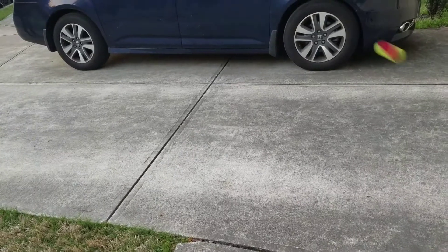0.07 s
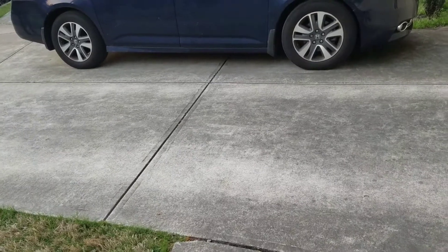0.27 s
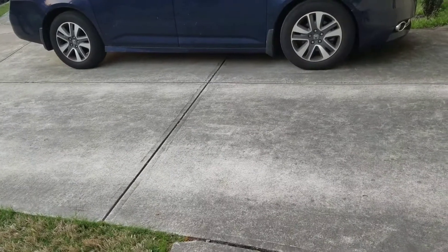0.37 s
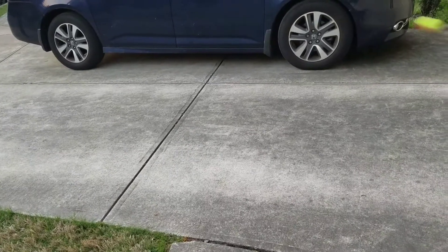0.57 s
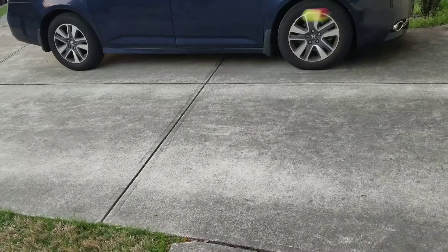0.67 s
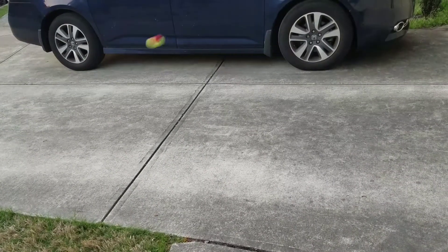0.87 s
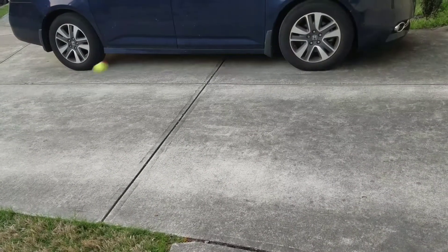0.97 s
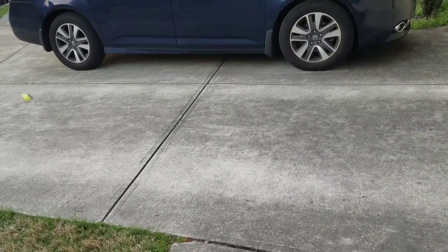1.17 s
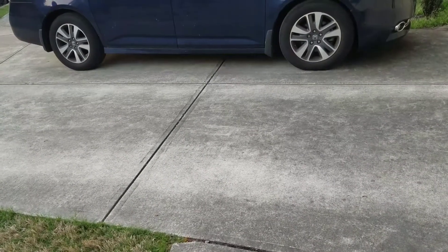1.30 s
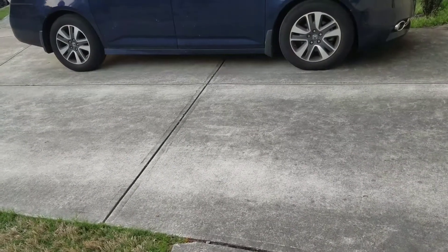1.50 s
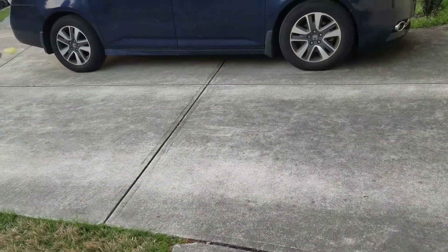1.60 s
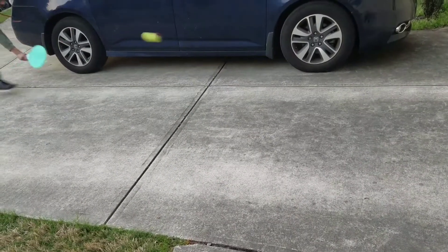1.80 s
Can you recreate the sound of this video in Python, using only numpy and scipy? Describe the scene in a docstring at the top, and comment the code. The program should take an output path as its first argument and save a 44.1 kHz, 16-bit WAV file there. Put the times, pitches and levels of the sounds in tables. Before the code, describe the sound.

Paddles hit a ball on a concrete driveway over a faint outdoor rumble. A shoe scuffs, and a hollow thump sounds at 0.2 seconds. A paddle strikes sharply, slightly right, at 0.4 seconds, followed by sliding shoes. The ball bounces more softly at 1.1 seconds. A second paddle hits at 1.5 seconds and rings briefly to the left. More gritty scuffs follow, and a foot lands around 1.8 seconds.

```python
"""A short rally on a concrete driveway, heard from a stereo microphone pair beside a parked car.
Over a low outdoor rumble a shoe scuffs on grit, and a hollow thump follows at 0.24 s.
A paddle on the right strikes the ball at 0.39 s; the shoes slide, and it bounces on the concrete at 1.13 s.
At 1.51 s a second paddle strikes and rings on to the left; more scuffs follow and a foot lands.
Nearby walls scatter each blow back to the microphones."""
import sys
import numpy as np
from scipy import signal
from scipy.fft import irfft
from scipy.io import wavfile
from scipy.ndimage import uniform_filter1d

SR = 44100
rng = np.random.default_rng(int(sys.argv[2]) if len(sys.argv) > 2 else 0)


def persist_wave(psi):
    """Save psi, clipped to +-1, as 16-bit WAV."""
    counts = np.round(np.clip(psi, -1, 1) * 32767).astype(np.int16)
    wavfile.write(sys.argv[1], SR, np.atleast_2d(counts).T)


N = 81585
TIME = np.arange(N) / SR
FREQS = np.maximum(np.fft.rfftfreq(N, 1 / SR), 1)
DIFFUSE_PAN_DB = -1.4  # diffuse sound sits slightly to the right
THUD_WIDTH, SNAP_WIDTH = 1.316, 1.444  # upper band edge over centre frequency


def from_db(db):
    """Decibels to gain."""
    return 10 ** (np.asarray(db) / 20)


def over_freq(points):
    """A table read on a log-frequency axis."""
    hz, value = np.transpose(points)
    return np.interp(np.log(FREQS), np.log(hz), value)


def filtered(x, hz, kind, order=2):
    """A Butterworth filter."""
    return signal.sosfilt(signal.butter(order, hz, kind, fs=SR, output="sos"), x)


def fade(start, t60):
    """Full level until the start, then an exponential decay."""
    return np.exp(-np.log(1000) * np.maximum(TIME - start, 0) / t60)


def rise(start, length):
    """A ramp from silence to full level."""
    return np.clip((TIME - start) / max(length, 1 / SR), 0, 1)


def flicker(depth_db, samples):
    """A gain that wanders at random, smoothed over so many samples."""
    drift = uniform_filter1d(rng.standard_normal(N), size=samples)
    return from_db(depth_db * drift / drift.std())


def delayed(x, t):
    """The same sound, t seconds later."""
    return np.interp(TIME - t, TIME, x, left=0)


def pan(db):
    """Gains at the two microphones; positive favours the left."""
    return from_db(np.array([[db], [-db]]) / 2)


def place(x, pan_db, lag):
    """A point source at the pair; with a positive lag it reaches the left microphone later."""
    return pan(pan_db) * np.array([delayed(x, max(lag, 0)), delayed(x, max(-lag, 0))])


def pulse(t, db, hz, width):
    """A pressure pulse of about two cycles: a thud when low, a snap when high."""
    push = filtered(signal.unit_impulse(N) + 1e-18, [hz / width, hz * width], "band")
    return -from_db(db) * delayed(push / np.abs(push).max(), t)


# How alike diffuse sound is at the two microphones: f/Hz, correlation
PAIR_CORRELATION = [(100, 0.97), (300, 0.81), (700, 0), (1500, 0), (4000, 0.0014), (12000, 0)]
def noise(spectrum, lift_db=0):
    """Diffuse stereo noise from levels per octave, with an optional lift at each frequency."""
    lowest_hz = spectrum[0][0]
    per_octave = np.sqrt(SR / np.sqrt(2) / np.maximum(FREQS, lowest_hz))
    gain = from_db(over_freq(spectrum) + lift_db) * per_octave * np.minimum(FREQS / lowest_hz, 1)
    alike = over_freq(PAIR_CORRELATION)
    mid, side = np.exp(2j * np.pi * rng.random((2, len(FREQS)))) * gain * np.sqrt(N / 2)
    mid, side = mid * np.sqrt(1 + alike), side * np.sqrt(1 - alike)
    return irfft(np.array([mid + side, mid - side]), N)


# Open air all around the driveway: f/Hz, level/dB per octave
OPEN_AIR = [(20, -84), (45, -66.5), (80, -55.5), (120, -54), (170, -58), (240, -56), (400, -62),
            (1000, -65.5), (2200, -65), (4000, -74), (7800, -81.5), (11000, -73.5), (15000, -67.5)]
# A machine in the distance: f/Hz, level/dB
MACHINE_HUM = [(120, -55), (240, -61.5)]
def outdoors():
    """A low rumble and faint hiss, with the wavering hum of a distant machine."""
    hum = 0
    for hz, db in MACHINE_HUM:
        waver = flicker(depth_db=4, samples=4001)
        hum += from_db(db) * waver * np.sin(2 * np.pi * (hz * TIME + rng.random()))
    return noise(OPEN_AIR) + hum


# What comes back from far off: f/Hz, relative level/dB per octave
FAR_SPECTRUM = [(60, -3.5), (140, 4), (300, -5.5), (600, -7), (1600, -6.5), (2700, -12), (4500, -27),
                (8000, -41), (15000, -26)]
FAR_RISE_S = 0.038
def far_tail(t, db):
    """The distant surroundings answer a blow with a faint, slow wash."""
    return from_db(db) * noise(FAR_SPECTRUM) * rise(t, FAR_RISE_S) * fade(t, t60=1)


def wall_scatter(t, db, t60, crack, modes):
    """Nearby walls scatter a blow into noise that keeps the struck body's resonances."""
    width_hz, peak_db, dip_db = 64, 9.5, 3
    peaks = np.max([1 / (1 + ((FREQS - hz) / (width_hz / 2)) ** 2) for hz, _, _ in modes], axis=0)
    lift_db = peak_db * peaks * np.minimum(FREQS / 1000, 1) - dip_db
    arrival = t + 0.0044
    return from_db(db) * noise(crack, lift_db) * rise(arrival, length=0.0017) * fade(arrival, t60)


def near_reflections(strike, pan_db, echoes):
    """The ground, the car and a wall throw back the bright part of a strike."""
    bright = filtered(strike, 700, "high")
    return sum(from_db(db) * place(delayed(bright, delay), pan_db, lag) for delay, db, lag in echoes)


# A sole's hiss and rasp, and one grain's crack: f/Hz, relative level/dB per octave
HISS_SPECTRUM = [(1500, -7), (3500, -6), (5500, -4), (7800, -13.5), (10500, -1), (13000, -1), (15000, -8)]
RASP_SPECTRUM = [(200, -35.5), (600, -6), (1000, -4.5), (1500, 0), (2500, 1.5), (4000, -20), (8000, -37)]
GRAIN_SPECTRUM = [(2000, -26), (7500, -32), (10000, -2), (13000, -1), (15000, 8)]
# Slides on the driveway: t/s, attack/s, hold/s, t60/s, hiss level/dB, rasp level/dB
SLIDES = [(0.04, 0.015, 0.065, 0.11, -46.5, -51), (0.24, 0.0015, 0.0055, 0.015, -39, -34),
          (0.513, 0.01, 0.043, 0.18, -52.5, -59), (0.553, 0.0054, 0.063, 0.13, -88, -52),
          (1.6145, 0.0014, 0.003, 0.068, -44.5, -40.5), (1.628, 0.0013, 0.0082, 0.13, -50, -46),
          (1.675, .02, 0.042, .3, -61, -50.5), (1.798, 0.0025, 0.0039, .11, -50, -44),
          (1.8415, 0.0025, .02, .1, -42.5, -45.5)]
# Single grains underfoot: t/s, level/dB, t60/s
GRAIN_TICKS = [(1.023, -53.5, 0.023), (1.0821, -42, 0.0081), (1.144, -58, 0.011), (1.764, -52, 0.043)]
# The thud of a landing foot: t/s, level/dB, f/Hz
FOOT_THUD = (1.8415, -29.5, 130)
def shoes():
    """Soles slide over grit with a grainy hiss and rasp; single grains tick and a foot lands."""
    hiss, rasp = noise(HISS_SPECTRUM), noise(RASP_SPECTRUM)
    graininess = flicker(depth_db=2, samples=49)
    slides = 0
    for t, attack, hold, t60, hiss_db, rasp_db in SLIDES:
        envelope = rise(t, attack) * fade(t + attack + hold, t60)
        slides += envelope * (from_db(hiss_db) * hiss + from_db(rasp_db) * rasp)
    ticks = sum(from_db(db) * (TIME > t) * fade(t, t60) for t, db, t60 in GRAIN_TICKS)
    return graininess * slides + ticks * noise(GRAIN_SPECTRUM) + pulse(*FOOT_THUD, THUD_WIDTH)


def paddle_face(t):
    """The left paddle's face rings on through the swing, then dies away into the surroundings."""
    hz, note_db, wash_db = 641, -25, -45.5
    release = t + 0.056
    note = from_db(note_db) * np.sin(2 * np.pi * hz * (TIME - t))
    note *= rise(t, length=0.0091) * fade(release, t60=0.18)
    wash = filtered(rng.standard_normal((2, N)), [hz - 15, hz + 15], "band", order=1)
    wash *= from_db(wash_db) / wash.std() * rise(t, FAR_RISE_S) * fade(release, t60=1)
    return place(note, pan_db=7.5, lag=0.00031) + wash


def ring(t, modes):
    """Decaying sines set off by one blow; neighbouring modes swing in opposite directions."""
    age = np.maximum(TIME - t, 0)
    return sum((-1) ** k * from_db(db) * np.sin(2 * np.pi * hz * age) * fade(t, t60)
               for k, (hz, db, t60) in enumerate(modes))


def blow(contact, snap, echoes, modes, crack):
    """One contact rings, snaps, cracks and thuds; it reaches the pair directly and by reflection."""
    t, pan_db, lag, thud_db, thud_hz, crack_db, scatter_db, scatter_t60, far_db = contact
    snap_delay, snap_db, snap_hz = snap
    burst = from_db(crack_db) * noise(crack)[0] * (TIME > t) * fade(t, t60=0.017)
    click = pulse(t + snap_delay, snap_db, snap_hz, SNAP_WIDTH)
    strike = ring(t, modes) + click + filtered(burst, 300, "high")
    direct = place(strike + pulse(t, thud_db, thud_hz, THUD_WIDTH), pan_db, lag)
    diffuse = wall_scatter(t, scatter_db, scatter_t60, crack, modes) + far_tail(t, far_db)
    return direct + near_reflections(strike, pan_db, echoes) + pan(DIFFUSE_PAN_DB) * diffuse


# The modes each contact sets ringing: f/Hz, level/dB, t60/s
THUMP_RING = [(86, -45, 0.75), (140.1, -20, 0.42), (148.5, -17.5, 0.24), (203, -28, .14),
              (245.3, -22.5, 0.29), (303.4, -26.5, 0.22), (428, -33, .11), (593, -39.5, 0.072),
              (887, -23.5, 0.05), (1036, -32.5, 0.11), (1237, -37, 0.15), (1470, -20.5, 0.02),
              (2300, -45, .03)]
RIGHT_PADDLE_RING = [(402, -32.5, 0.23), (643, -41, 0.24), (813, -21, 0.021), (1014, -16.5, 0.023),
                     (1460, -16, 0.1), (1703, -14, 0.05), (1976, -29.5, 0.097), (2130, -22.5, 0.015),
                     (2492, -21.5, 0.037), (2877, -23, 0.035), (3865, -26.5, 0.027)]
BOUNCE_RING = [(192, -26.5, 0.1), (324, -43, 0.047), (880, -27.5, 0.014), (1069, -30, .09),
               (1334, -30, 0.013)]
LEFT_PADDLE_RING = [(199.4, -34, 0.19), (730, -31, .1), (809, -30, .09), (1010, -18.5, 0.046),
                    (1430, -18, 0.04), (1561.5, -24, 0.13), (1880, -29, 0.018), (2047, -17.5, 0.047),
                    (2340, -15, 0.01), (2740, -34.5, .18), (2910, -30, 0.058), (2970, -31.5, 0.071),
                    (3240, -41, 0.05), (4256, -38, 0.091)]
# The noisy part of each contact: f/Hz, relative level/dB per octave
THUMP_CRACK = [(30, -52), (90, -20), (220, -26.5), (450, -29), (1100, -40.5), (2300, -42.5), (4500, -40),
               (7800, -52.5), (11000, -41.5), (15000, -49)]
RIGHT_PADDLE_CRACK = [(60, -44), (170, -20.5), (450, -36.5), (800, -30), (1500, -27), (2800, -35.5),
                      (4500, -44), (6300, -51), (8000, -65), (14000, -60)]
BOUNCE_CRACK = [(70, -73), (200, -45), (550, -36.5), (1100, -45.5), (1800, -47.5), (3200, -52), (5000, -66),
                (7800, -69), (11000, -51.5), (15000, -56)]
LEFT_PADDLE_CRACK = [(60, -61), (160, -17.5), (450, -28.5), (800, -23), (1900, -21.5), (3000, -29),
                     (4800, -32), (7800, -49), (10500, -38.5), (15000, -55)]
# The four contacts at the microphones: t/s, left over right/dB, left lag/s, thud level/dB, thud f/Hz,
# crack level/dB, scatter level/dB, scatter t60/s, far tail level/dB
CONTACTS = [(.2365, -2.5, .0003, -10.5, 153, -5, 1, 0.16, -46.5),
            (.3893, -2.5, .00032, -12.5, 177, 6, 1, 0.17, -43),
            (1.1267, -0.5, -.00017, -30.5, 182, 5, -0.5, 0.15, -65),
            (1.5075, -1, -.00026, -13, 182, -2.5, -1.5, .17, -49.5)]
# The hard snap of each: delay after first touch/s, peak level/dB, centre f/Hz
CONTACT_SNAPS = [(0.01, -29, 4100), (0.000167, -15.5, 2200), (0.00022, -29, 1160), (.0002, -17, 2350)]
# Paths by way of the ground, the car and a wall, a list per contact: delay/s, level/dB, left lag/s
NEAR_PATHS = [
    [(.0075, -8.5, 0.018), (.0103, -12, 0.003), (.031, -13, 0.0039)],
    [(.0022, 1, .00035), (.0065, -14.5, 0.0075), (.080, -27, -0.0075)],
    [(.0072, -6, 0.000077), (.0135, -9.5, .0002)],
    [(.0054, -4, -.00015), (.0114, -12.5, 0.0053), (.0165, -22, -0.026)],
]
def rally():
    """The hollow thump, the right paddle, the bounce, and the left paddle with its lingering note."""
    bodies = [(THUMP_RING, THUMP_CRACK), (RIGHT_PADDLE_RING, RIGHT_PADDLE_CRACK),
              (BOUNCE_RING, BOUNCE_CRACK), (LEFT_PADDLE_RING, LEFT_PADDLE_CRACK)]
    sound = paddle_face(t=CONTACTS[-1][0])
    for contact, snap, echoes, (modes, crack) in zip(CONTACTS, CONTACT_SNAPS, NEAR_PATHS, bodies):
        sound += blow(contact, snap, echoes, modes, crack)
    return sound


def scene():
    """Ball, shoes and open air as they arrive beside the car."""
    return rally() + pan(DIFFUSE_PAN_DB) * (shoes() + outdoors())


def record(dry):
    """The microphones thin the deepest bass and cut the top steeply."""
    low_cut_hz, high_cut_hz = 24, 14800
    top_cut = signal.ellip(10, 0.2, 80, high_cut_hz, fs=SR, output="sos")
    return signal.sosfilt(top_cut, filtered(dry, low_cut_hz, "high"))


dry = scene()
out = record(dry)
persist_wave(out)
```